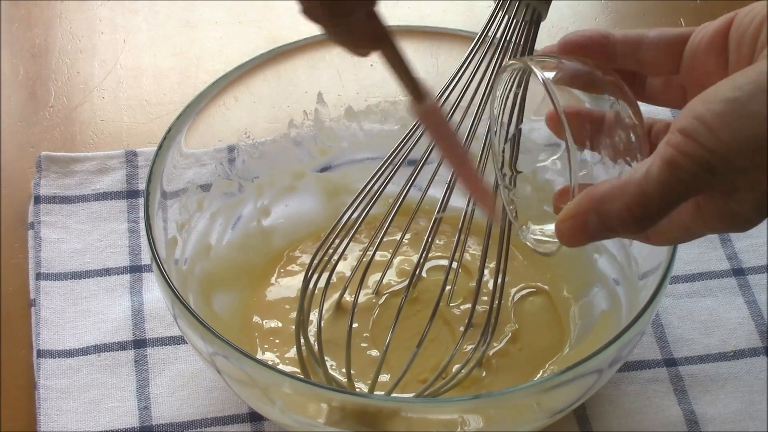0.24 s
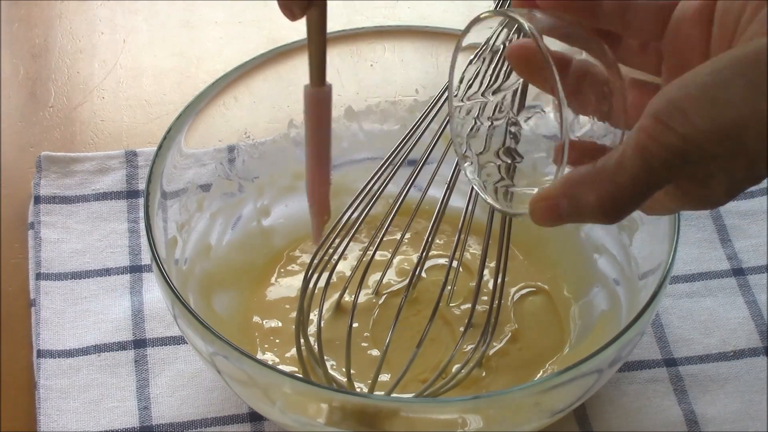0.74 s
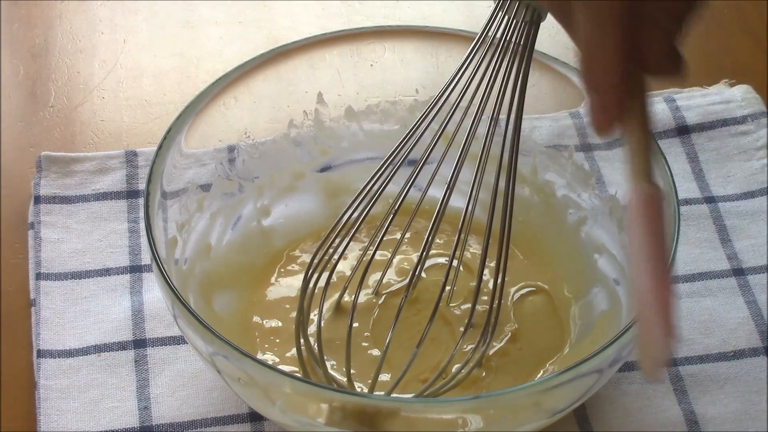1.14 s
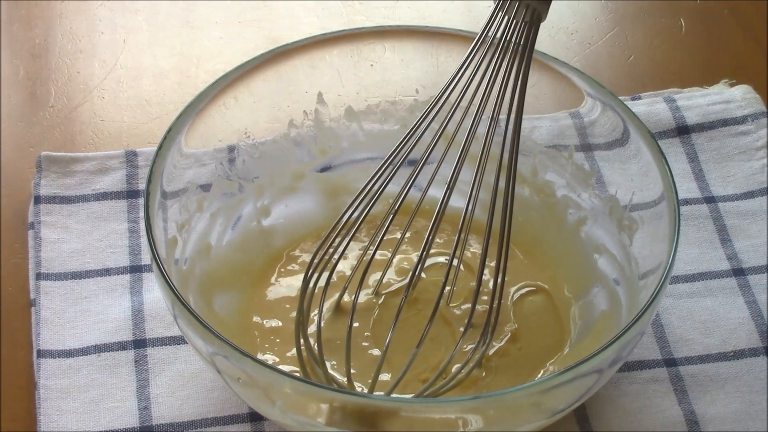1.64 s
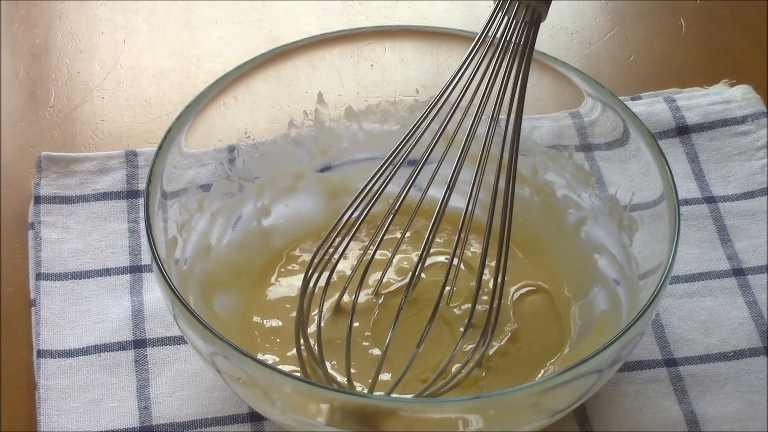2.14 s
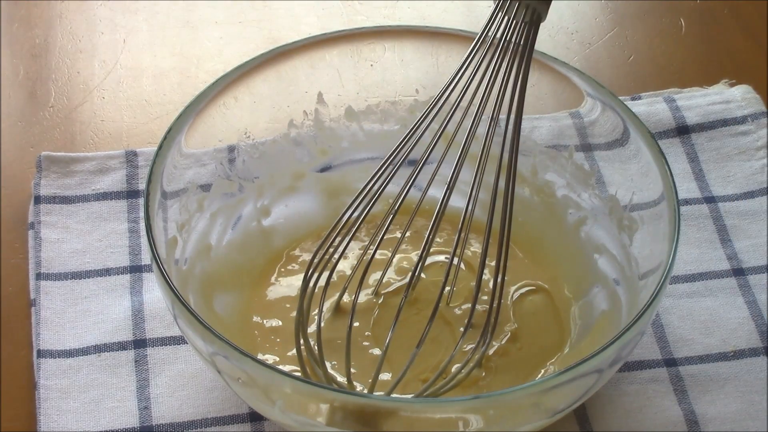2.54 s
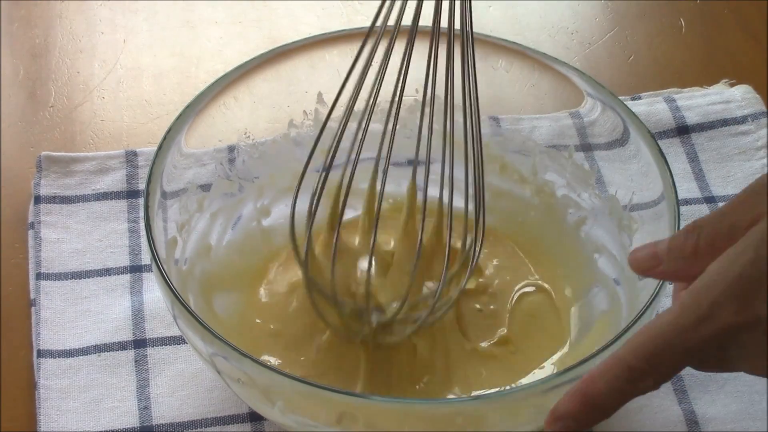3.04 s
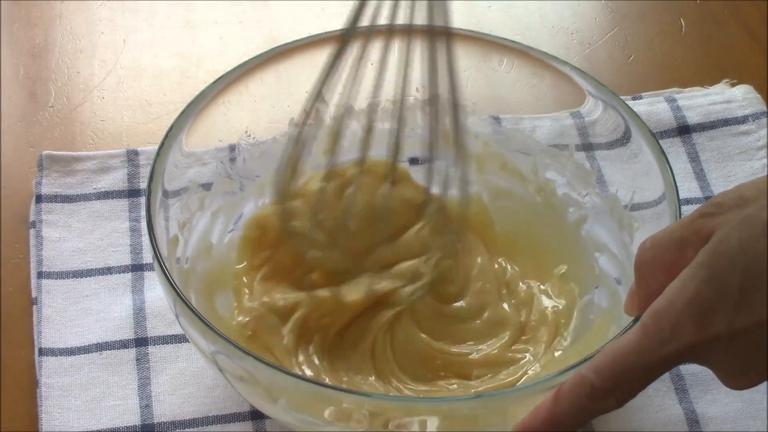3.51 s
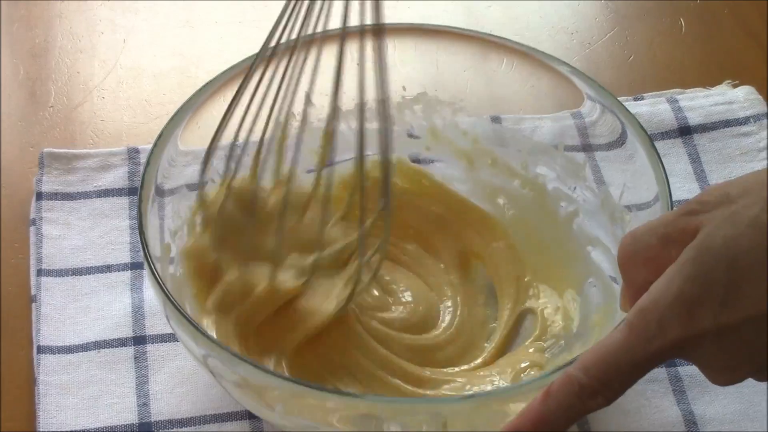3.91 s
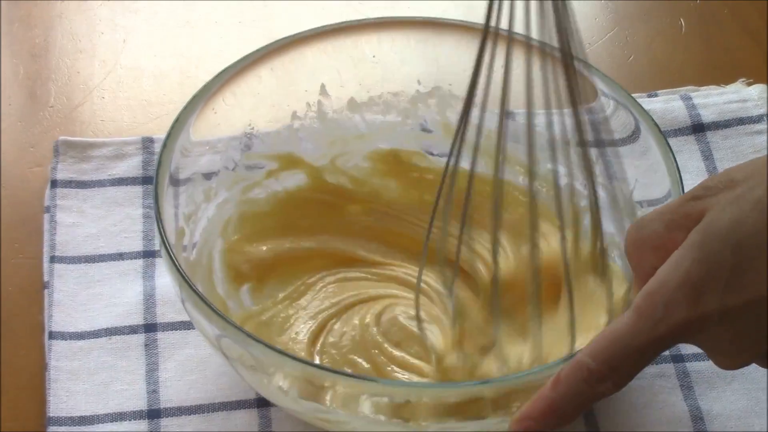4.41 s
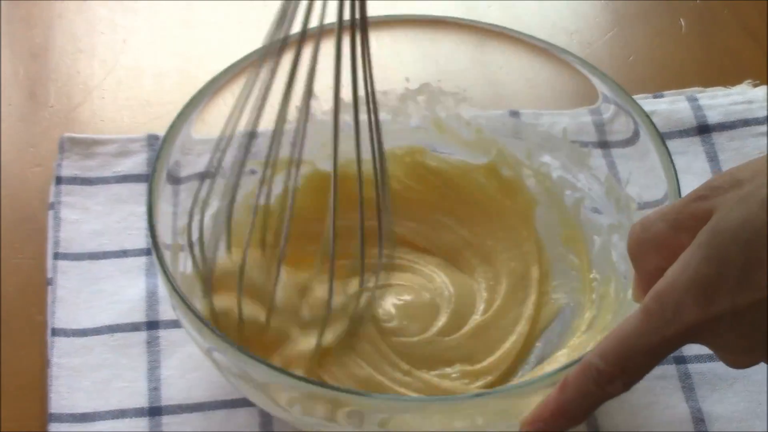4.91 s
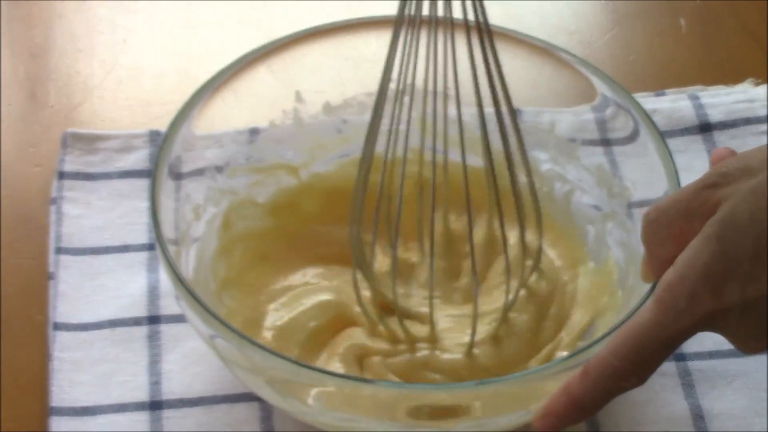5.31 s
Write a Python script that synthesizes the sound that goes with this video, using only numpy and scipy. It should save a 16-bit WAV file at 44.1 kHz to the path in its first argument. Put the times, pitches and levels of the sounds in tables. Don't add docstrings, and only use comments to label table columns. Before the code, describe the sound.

Glass clinks and a wooden knock on a kitchen table, a short pause, then brisk whisking of thick batter against a glass bowl.

```python
import sys
import numpy as np
from scipy import signal
from scipy.fft import rfft, irfft, next_fast_len
from scipy.io import wavfile

SR = 44100
rng = np.random.default_rng(int(sys.argv[2]) if len(sys.argv) > 2 else 0)


def ratio_of_db(decibels):
    return 10 ** (np.asarray(decibels, float) / 20)


def unload_audio(sound):
    columns = np.transpose(np.atleast_2d(sound))
    steps = np.round(np.clip(columns, -1, 1) * 32767)
    wavfile.write(sys.argv[1], SR, steps.astype(np.int16))


N = 245195


def unit(x):
    return x / np.sqrt(np.mean(x ** 2) + 1e-20)


def along(points, hz):
    point_hz, value = np.transpose(points)
    return np.interp(np.log(hz + 1), np.log(point_hz + 1), value)


def filtered(x, response):
    size = next_fast_len(len(x) + 8192)
    spectrum = rfft(x, size) * response(np.fft.rfftfreq(size, 1 / SR))
    return irfft(spectrum, size)[:len(x)]


def bass_cut(hz, corner_hz):
    return 1j * hz / (corner_hz + 1j * hz)


def resonances(peaks):
    def response(f):
        total = 0
        for k, (hz, width_hz, db) in enumerate(peaks):
            peak = 1j * f * width_hz / (hz * hz - f * f + 1j * f * width_hz)
            total = total + (-1) ** k * ratio_of_db(db / 2) * peak
        total = total ** 2
        return total / np.sqrt(np.mean(abs(total) ** 2))
    return response


def causal(colour):
    spectrum = ratio_of_db(along(colour, np.fft.rfftfreq(4096, 1 / SR))) + 1e-6
    cepstrum = irfft(np.log(spectrum))
    cepstrum[1:2048] *= 2
    cepstrum[2049:] = 0
    pulse = irfft(np.exp(rfft(cepstrum)))
    return pulse / np.linalg.norm(pulse)


def burst(lives, count):
    fade = np.exp(-np.arange(count) / SR / np.reshape(lives, (-1, 1)))
    noise = fade * rng.standard_normal(fade.shape)
    energy = np.linalg.norm(fade, axis=1, keepdims=True)
    return noise * energy / np.linalg.norm(noise, axis=1, keepdims=True)


# (pitch_hz, t60_s)
REVERB_TIMES = [(300, 0.44), (1200, 0.23), (4000, 0.23), (9000, 0.21), (16000, 0.19)]
# (delay_s, level_db)
NEAR_ECHOES = [
    (.0065, -32.5),
    (.0085, -22.5),
    (0.019, -28),
    (0.023, -41.5),
]


def room(x, tail_db, direct=1):
    hz, t, grid = signal.stft(rng.standard_normal(SR // 2), SR, nperseg=256)
    fade = ratio_of_db(-60 * t / along(REVERB_TIMES, hz)[:, None])
    tail = signal.istft(grid * fade, SR, nperseg=256)[1][:SR // 2]
    tail *= 1 - np.exp(-np.arange(len(tail)) / SR / 0.002)
    answer = ratio_of_db(tail_db) * tail / np.linalg.norm(tail)
    answer[0] = direct
    for delay_s, db in NEAR_ECHOES:
        answer[round(delay_s * SR)] += ratio_of_db(db)
    return signal.fftconvolve(x, answer)


def strikes(contacts, modes, colour, tail_db):
    out = np.zeros(N + 2 * SR)
    t = np.arange(SR // 2) / SR
    pulse = causal(colour)
    for start_s, db, ring_db, length_s, treble_db in contacts:
        ring = np.zeros(len(t))
        for (hz, level_db, t60_s), chance_db in zip(modes, rng.standard_normal(len(modes))):
            ring += ratio_of_db(level_db + chance_db - 60 * t / t60_s) * np.sin(2 * np.pi * hz * t)
        rough = burst(max(length_s, 2e-4), count=SR // 2)[0]
        crack = signal.fftconvolve(rough, pulse)[:len(t)]

        def hardness(hz):
            shelf = (1 + ratio_of_db(treble_db) * 1j * hz / 3000) / (1 + 1j * hz / 3000)
            return shelf * bass_cut(hz, 330) ** 3

        even = np.pad(pulse, (0, len(t) - len(pulse))) * np.linalg.norm(crack)
        wet = room(filtered(even, hardness), tail_db, direct=0)
        wet[:len(t)] += filtered(crack, hardness)
        wet += room(filtered(ratio_of_db(ring_db) * ring, hardness), tail_db - 14.5)
        out[round(start_s * SR):][:len(wet)] += ratio_of_db(db - 6.0) * wet
    return out[:N]


# (pitch_hz, level_db)
FAN_COLOUR = [(20, -34.5), (91, -28.5), (184, -25), (251, -12.5), (332, -17.5), (404, -11), (729, -3.5),
              (1050, -9), (1950, -12), (5830, -26), (10000, -29.5), (15700, -34), (16300, -42.5)]
# (pitch_hz, width_hz, level_db)
MOTOR_TONES = [(121.4, 5.4, -93.5), (250.15, 20, -73.5), (375.2, 14, -76.5), (665.3, 36, -71.5),
               (753, 22, -68.5), (964, 33, -68), (1970, 53, -79.5), (7000, 60, -83), (14100, 74, -97)]


def kitchen_air():
    rush = filtered(rng.standard_normal(N), lambda hz: ratio_of_db(along(FAN_COLOUR, hz)))
    air = ratio_of_db(-59.0) * unit(rush)
    for hz, width_hz, db in MOTOR_TONES:
        air += ratio_of_db(db) * unit(filtered(rng.standard_normal(N), resonances([(hz, width_hz, 0)])))
    return air


# (start_s, level_db)
TABLE_THUMPS = [
    (1.7181, -54.5),
    (1.8767, -52.5),
]


def thumps():
    out = np.zeros(N + SR)
    age = np.arange(SR // 20) / SR / 0.0036
    for start_s, db in TABLE_THUMPS:
        out[round(start_s * SR):][:len(age)] += ratio_of_db(db) * (1 - age) * np.exp(-age)
    return out[:N]


# (start_s, level_db, ring_db, length_s,
# treble_db)
CUP_TAP = [
    (.0878, -18, -6.5, 0.0011, -1.5),
    (.0965, -35, 0, 0.0013, -24),
    (.1052, -35, 2, 0.0024, -26),
]
RIM_BRUSHES = [
    (.177, -53, -13, 0.0025, 10),
    (.343, -50.5, -2.5, 0.0043, 2.7),
    (.349, -56, -20, 0.0037, 8.9),
    (.391, -41.5, -7, 0.0032, 3.3),
]
# (pitch_hz, level_db, t60_s)
TAPPED_CUP_MODES = [(1134, -11, 0.032), (1680, 2, 0.02), (1960, -9, 0.07), (2060, -8, .09), (2200, -9, .04),
                    (4860, -22, .015), (9600, -24.5, .06), (13500, -13, .03)]
CUP_RIM_MODES = [(1910, 7.5, 0.052), (4880, -0.5, 0.058), (8800, -13, .05), (9680, -16, .04)]
# (pitch_hz, level_db)
TAP_CRACK = [(200, -51), (770, -6.5), (1400, -12), (1900, 3), (2500, -13), (3200, -35), (4800, -16),
             (13500, -44), (16500, -65)]


def spatula_on_cup():
    taps = strikes(CUP_TAP, TAPPED_CUP_MODES, TAP_CRACK, tail_db=-6.5)
    return taps + strikes(RIM_BRUSHES, CUP_RIM_MODES, TAP_CRACK, tail_db=1)


# (start_s, level_db, ring_db, length_s, treble_db)
CUP_LANDING = [
    (1.7183, -8, -10, 0.0013, 1),
    (1.7243, -8.5, -21, 0.0038, 1),
]
# (pitch_hz, level_db, t60_s)
FREE_CUP_MODES = [(1305, -12.5, 0.087), (1690, -2.5, 0.058), (4296, -14.5, .2), (4762, -12, 0.25),
                  (4788, -13, .25), (4813, -13, .2), (5820, -18.5, 0.086), (7700, 2, 0.1), (7890, -6, .07),
                  (8085, -7.5, 0.07), (9600, -5.5, .04), (12041, -2, .19), (12100, -3, .12),
                  (14080, -13.5, .05)]
# (pitch_hz, level_db)
LANDING_CRACK = [(18, -66.5), (30, -37.5), (171, -48.5), (732, -4.5), (814, -9.5), (1890, 0.5), (3970, -13),
                 (4770, -6), (6550, -15.5), (7880, 6), (10800, -13), (12000, -2), (16500, -22.5)]


def cup_put_down():
    return strikes(CUP_LANDING, FREE_CUP_MODES, LANDING_CRACK, tail_db=-2.0)


# (start_s, level_db, ring_db, length_s, treble_db)
FIRST_CLINKS = [
    (1.8652, -17, -18.5, .002, -7.5),
    (1.8685, -25, -8.5, .003, -1.5),
]
SPATULA_CLASH = [
    (1.8762, -15, -5.5, 0.0038, 9.5),
    (1.8785, -13, -19.5, 0.0025, 3),
    (1.886, -14.5, -14, 0.0073, -2.5),
]
# (pitch_hz, level_db, t60_s)
SPATULA_CUP_MODES = [(964, -6, 0.1), (1200, 4.5, 0.075), (1385, -1, .055), (1530, -10, .03),
                     (1860, -10, 0.04), (4760, -14, 0.06), (6368, -10, 0.045), (6990, -9, .04),
                     (7920, -6, .05), (9675, 7, 0.046), (12090, -12, .05), (13550, -8, .03)]
# (pitch_hz, level_db)
CLASH_CRACK = [(18, -60), (30, -48), (158, -69.5), (835, -12.5), (1210, 3), (1310, -3), (3570, -19.5),
               (4410, -15), (9230, -16), (9990, -15.5), (11400, -22.5), (15200, -14), (16500, -51.5)]


def spatula_put_down():
    clinks = strikes(FIRST_CLINKS, FREE_CUP_MODES, CLASH_CRACK, tail_db=2.5)
    return clinks + strikes(SPATULA_CLASH, SPATULA_CUP_MODES, CLASH_CRACK, tail_db=4.0)


# (start_s, level_db, ring_db, length_s, treble_db)
ROCKING = [
    (2.031, -31, -11, 0.0025, -22),
    (2.056, -31, -7.5, 0.0032, 0.5),
]
BOUNCES = [
    (2.092, -25.5, 2.5, 0.0043, -24),
    (2.0965, -23.5, -1.5, 0.0032, 2.5),
    (2.1, -28, -5.5, 0.0015, 0.5),
]
SETTLING = [
    (2.2214, -40, 0, 0.0018, 0),
    (2.2434, -46, -10, 0.0016, 0),
]
# (pitch_hz, level_db, t60_s)
ROCKING_MODES = [(1220, -1, .03), (1800, 2, 0.02), (4600, -22, 0.05), (5750, -12, 0.14), (7000, 4, 0.016),
                 (9630, -4.5, 0.031)]
BOUNCING_MODES = [(1093, -10.5, 0.18), (1717, -2.5, 0.06), (4080, -9, 0.034), (7160, -8, 0.017),
                  (9240, -1.5, 0.015), (10750, -11, 0.048), (13560, -7, 0.018)]
SETTLING_MODES = [(2070, 9.5, 0.016), (4300, -4, 0.04), (7360, -9, .04), (9850, -14, .04),
                  (12500, -22, .02)]
# (pitch_hz, level_db)
ROCK_CRACK = [(290, -48), (500, -23), (1120, 5.5), (1890, -7.5), (2570, -23), (7170, -20), (15100, -27),
              (16500, -49.5)]
BOUNCE_CRACK = [(180, -77), (300, -38), (1130, 1.5), (1770, -3), (3140, -21), (4030, -18.5), (9330, -22),
                (11800, -26), (13500, -23), (16500, -42)]


def rocking_to_rest():
    rocks = strikes(ROCKING, ROCKING_MODES, ROCK_CRACK, tail_db=1.5)
    bounces = strikes(BOUNCES, BOUNCING_MODES, BOUNCE_CRACK, tail_db=1.0)
    return rocks + bounces + strikes(SETTLING, SETTLING_MODES, ROCK_CRACK, tail_db=-1)


# (start_s, level_db, ring_db, length_s, treble_db)
HANDLE_KNOCKS = [
    (2.3205, -31.5, -27, 0.0012, -18),
    (2.3353, -18, -9.5, 0.0022, 5.5),
    (2.3745, -28.5, -5, 0.0015, -26),
]
# (pitch_hz, level_db, t60_s)
WOOD_MODES = [(527, -5.5, 0.093), (900, -11, 0.032), (1256, -2, 0.04), (1550, -3, 0.072), (1950, 5, .014),
              (3080, 10.5, 0.0094), (4870, -2, 0.0065), (8000, -3, 0.0044)]
# (pitch_hz, level_db)
WOOD_CRACK = [(120, -75.5), (200, -34), (522, -4), (900, 0), (1500, -0.5), (3200, -7.5), (7460, -25.5),
              (14000, -50.5), (16500, -60)]


def handle_knock():
    return strikes(HANDLE_KNOCKS, WOOD_MODES, WOOD_CRACK, tail_db=0.2)


# (start_s, level_db, ring_db, length_s, treble_db)
BASE_KNOCK = [
    (3.4625, -34.5, -1, 0.0017, -10),
]
WALL_KNOCKS = [
    (3.9235, -39.5, -11, 0.0023, 18),
    (4.043, -49, -3.5, 0.0014, -10),
    (4.3195, -45, -8, .0015, -4),
    (5.16, -44, -4, 0.0049, -15),
    (5.178, -46, -3, 0.0036, -12),
    (5.325, -48, -8, 0.013, -14),
]
# (pitch_hz, level_db, t60_s)
BOWL_BASE_MODES = [(624, 2.8, 0.079), (820, 1.8, 0.033)]
BOWL_SIDE_MODES = [(940, 11, 0.099), (1117, 4, 0.11), (1730, 12, 0.02)]


def bowl_knocks():
    base = strikes(BASE_KNOCK, BOWL_BASE_MODES, WOOD_CRACK, tail_db=-7)
    return base + strikes(WALL_KNOCKS, BOWL_SIDE_MODES, ROCK_CRACK, tail_db=-9.5)


# (start_s, level_db, lowest pitch_hz)
WIRE_SNAPS = [(3.033, -33.5, 6500), (3.118, -35.5, 7700), (3.1854, -39, 8000), (3.298, -32.5, 6500),
              (3.4035, -35.5, 7500), (3.593, -40, 4000), (3.917, -44, 7000), (4.0271, -23, 1290),
              (4.034, -28, 9600), (4.739, -32, 1500), (5.0779, -29, 1460), (5.0876, -29, 1470),
              (3.816, -38, 9000), (3.857, -39, 8000), (3.9995, -42.5, 7500), (4.0271, -24, 6500),
              (3.8205, -45, 8000), (4.006, -52, 7000), (4.371, -42.5, 8000), (4.594, -35, 9000),
              (5.226, -46, 9000), (5.256, -52, 8000), (5.292, -52, 8000), (5.333, -42, 7000),
              (5.354, -61, 9000)]


def snaps():
    out = np.zeros(N + SR)
    width_hz = 4100
    for start_s, db, low_hz in WIRE_SNAPS:
        def wire(hz):
            peak_hz = 1.7 * low_hz
            band = bass_cut(hz, low_hz) ** 2 / (1 + 1j * hz / 14000) ** 3
            return band * 1j * hz * width_hz / (peak_hz ** 2 - hz ** 2 + 1j * hz * width_hz)

        click = filtered(burst(0.00007, count=1024)[0], wire)
        echo = np.convolve(click, burst(0.00047, count=256)[0])[:len(click)]
        click *= ratio_of_db(db) / abs(click).max()
        echo *= ratio_of_db(-10.5) * np.linalg.norm(click) / np.linalg.norm(echo)
        out[round(start_s * SR):][:len(click)] += click
        out[round((start_s + .0078) * SR):][:len(echo)] += echo
    return out[:N]


# (start_s, effort_db)
STIRRING = [
    (2.9, -21),
    (3.42, -7),
    (3.75, -6),
    (4.04, -4.5),
    (4.38, -4),
    (4.75, -3),
    (5.02, -1.5),
    (5.3, -8),
    (5.56, -11),
]


def scrape(grains_per_s, spread_db, smooth):
    t = np.arange(N) / SR
    effort_db = np.interp(t, *np.transpose(STIRRING), left=-60)
    draw = rng.random((4, N))
    slips = (draw[0] < grains_per_s / SR) * ratio_of_db(-spread_db * draw[1:])
    slips = signal.lfilter([1], [1, -np.exp(-1 / (0.0015 * SR))], slips)
    drag = np.zeros((3, N))
    for k, (full_db, growth) in enumerate([(-52, 1.1), (-54.5, 1.2), (-61, 0.91)]):
        rubbing = (unit(slips[k]) + smooth) * rng.standard_normal(N)
        drag[k] = ratio_of_db(full_db + growth * effort_db) * unit(rubbing)
    lift_start_s, lift_length_s = 5.39, .085
    lift = np.clip((t - lift_start_s) / lift_length_s, 0, 1)
    drag[2] += ratio_of_db(-58) * np.sin(np.pi * lift ** 0.54) * rng.standard_normal(N)
    return drag


# (start_s, wire_db, glass
# wall_db, bowl_db, ping_hz)
WHISK_STROKES = [(3.0949, -43.5, -62, -59, 1960), (3.1408, -33, -49.5, -44.5, 1860),
                 (3.3298, -46, -56.5, -55, 3300), (3.4144, -48, -53, -54, 1800),
                 (3.4552, -46, -52, -43, 2150), (3.4602, -50, -49, -50, 2600),
                 (3.4724, -54, -55, -40.5, 2000), (3.491, -48, -54, -50, 2050),
                 (3.5558, -50, -70, -67, 1970), (3.571, -46, -67, -55, 1820),
                 (3.6153, -41.5, -51.5, -48.5, 1880), (3.674, -46, -54.5, -50, 1940),
                 (3.7073, -47, -53, -49.5, 2580), (3.7116, -42, -50, -51, 3560),
                 (3.745, -45, -59, -61, 1960), (3.7623, -49, -52, -47, 2290), (3.781, -50, -62, -59, 2050),
                 (3.7958, -40, -53, -52, 3260), (3.7979, -43, -55, -47, 1730),
                 (3.8119, -43, -50, -47, 1470), (3.8277, -48, -49, -45.5, 1830),
                 (3.8319, -47, -45, -55, 1860), (3.838, -42, -53, -45.5, 1670),
                 (3.8836, -52, -58, -57, 1810), (3.9067, -47, -49, -44, 2060),
                 (3.921, -31, -41.5, -36.5, 1520), (3.925, -37, -45.5, -39, 1770),
                 (3.9345, -48, -45, -39, 1640), (3.97, -42, -54, -49, 1800),
                 (4.0432, -44, -54, -44.5, 1840), (4.0547, -49, -52, -52, 1980),
                 (4.0775, -43, -51, -51, 1870), (4.0853, -41, -48.5, -57, 4510),
                 (4.111, -47, -60, -48, 1510), (4.1275, -27.5, -45, -41, 3180),
                (4.1306, -35.5, -40, -52, 3380), (4.1364, -43, -65, -44, 3370),
                (4.143, -49, -56, -50, 1910), (4.1558, -41, -52, -48, 1780), (4.1654, -43, -51, -49, 1760),
                (4.1788, -38, -49.5, -42, 3160), (4.1815, -44, -48, -52, 1760),
                (4.231, -53, -56, -54, 1430), (4.2318, -37.5, -48, -45, 1950),
                (4.2467, -44, -51, -41.5, 1800), (4.2584, -48, -49, -43.5, 1650),
                (4.2663, -40, -46, -53, 2040), (4.2968, -39, -53, -53, 1850), (4.3175, -46, -49, -49, 2420),
                (4.3344, -39, -44, -43, 3500), (4.3371, -38, -47.5, -42, 4850),
                (4.3414, -47, -57, -47, 1950), (4.346, -45, -57, -54, 1830), (4.37, -40.5, -54, -54, 1420),
                (4.3856, -41, -45.5, -45, 4450), (4.396, -47, -68, -45, 1830),
                (4.4122, -46, -64, -54, 1440), (4.4339, -49, -54, -48, 2080), (4.438, -28, -44, -41, 4720),
                (4.4417, -36.5, -48, -43, 1800), (4.4493, -37, -46, -43.5, 1840),
                (4.4541, -39, -44, -57, 3940), (4.4728, -41, -51, -60, 1590), (4.4871, -39, -49, -46, 1400),
                (4.5005, -34, -47, -55, 2040), (4.5184, -40, -49, -40.5, 4540),
                (4.5273, -42, -50, -44, 1860), (4.5341, -20.5, -37.5, -45, 1900),
                (4.5401, -32, -42, -36.5, 2300), (4.5452, -44, -43, -45.5, 2020),
                (4.5544, -48, -63, -56, 2130), (4.5696, -48, -56, -56, 1790),
                (4.5874, -48, -49.5, -43.5, 1770),
                 (4.6344, -43, -61, -55, 1400), (4.6408, -43, -62, -53, 1400), (4.6446, -40, -49, -44, 2010),
                (4.6486, -42, -41, -51, 3970), (4.6609, -45, -56, -59, 3900),
                (4.692, -35, -47.5, -60, 1970), (4.7102, -51, -45, -41, 2580),
                (4.7303, -29.5, -42.5, -38, 1840), (4.7544, -45, -56, -46, 1700),
                (4.7575, -42, -60, -51, 1560), (4.7735, -45, -54, -53, 2160),
                (4.7969, -44, -45.5, -57, 3930), (4.804, -44.5, -49, -61, 4440),
                (4.8266, -41, -67, -61, 1670), (4.831, -44, -62, -61, 1870), (4.8417, -45, -63, -57, 1870),
                (4.8489, -46, -45, -49, 1880), (4.8528, -38, -54, -44.5, 1800),
                (4.8696, -41.5, -50, -53, 3650), (4.8789, -47, -50.5, -44, 1650),
                (4.8949, -58, -54, -45, 2120), (4.898, -38, -55, -45, 1950), (4.9114, -43, -48, -40, 1830),
                (4.9277, -36, -43, -45, 1460), (4.943, -41.5, -47.5, -47, 5370),
                (4.948, -32, -48, -53, 3250), (4.9492, -31, -42, -39, 1970), (4.9624, -34, -44, -45, 2020),
                (4.9931, -49, -64, -64, 1930), (5.0006, -47, -60, -60, 1910),
                (5.022, -42, -47.5, -48, 1980), (5.0256, -45, -43, -42.5, 3400),
                (5.0428, -52, -52, -47, 3300), (5.0644, -53, -63, -60, 1850), (5.0799, -31, -53, -41, 1810),
                (5.112, -52, -54, -44, 1800), (5.1323, -39, -48, -49, 2190),
                (5.1416, -48, -47.5, -43.5, 1430), (5.1704, -36.5, -51, -48, 1960),
                (5.176, -35.5, -45.5, -50, 1870),
                 (5.1802, -40, -51, -46, 1830),
    (5.2315, -49, -66, -57, 1900),
    (5.2458, -39, -51, -49, 1940),
    (5.3108, -46, -52.5, -55, 1700),
]


def ticks():
    contacts = WHISK_STROKES
    force, ping = np.zeros((3, N + SR)), np.zeros(N + SR)
    t = np.arange(2048) / SR
    for start_s, wire_db, wall_db, bowl_db, ping_hz in contacts:
        at = round((start_s + .0008) * SR)
        push_db = np.array([bowl_db, wall_db, wire_db]) + [-1.5, 2.5, -8.5]
        force[:, at:][:, :len(t)] += ratio_of_db(push_db)[:, None] * burst([0.0043, 0.0024, 0.0015], count=2048)
        ping_db = 1 + (bowl_db if ping_hz < 2300 else wall_db)
        ping[at:][:len(t)] += ratio_of_db(ping_db - 60 * t / 0.018) * np.sin(2 * np.pi * ping_hz * t)
        twang_hz = 7000 * 2.4 ** rng.random()
        ping[at:][:len(t)] += ratio_of_db(wire_db - 8.5 - 60 * t / .007) * np.sin(2 * np.pi * twang_hz * t)
    return force[:, :N], ping[:N]


# (pitch_hz, width_hz, level_db)
BOWL_BODY = [(597, 290, -4), (877.4, 43, 8), (1052, 165, 5.5), (1380, 510, -2), (1830, 320, 8.5),
             (2310, 1600, -11.5)]
GLASS_WALL = [(2480, 690, 1), (3910, 1500, 3.5), (4690, 700, 9.5), (6500, 2540, -6.5)]
WHISK_WIRES = [(8000, 3200, 0), (11500, 3900, 13), (15600, 2100, 2)]


def whisk():
    force, pings = ticks()
    force = force + ratio_of_db(-6.0) * scrape(grains_per_s=440, spread_db=15.5, smooth=0.54)
    dry = filtered(pings, lambda hz: bass_cut(hz, 600) ** 2)
    for push, body in zip(force, (BOWL_BODY, GLASS_WALL, WHISK_WIRES)):
        dry = dry + filtered(push, resonances(body))
    dry = dry + snaps()
    out = np.zeros(N + SR)
    step = SR // 4
    for k in range(0, N, step):
        wet = room(dry[k:k + step], tail_db=-6.5)
        out[k:k + len(wet)] += wet
    return out[:N]


def scene():
    put_down = cup_put_down() + spatula_put_down() + rocking_to_rest() + handle_knock()
    mix = kitchen_air() + thumps() + spatula_on_cup() + put_down + bowl_knocks() + whisk()
    return mix[None]


def low_pass(x):
    return signal.sosfilt(signal.butter(12, 16790, fs=SR, output="sos"), x)


def record(dry):
    limit, top_hz = .56, 15880
    shaved = dry[0] / (1 + abs(dry[0] / limit) ** 4) ** (1 / 4) - dry[0]
    mic = dry[0] + filtered(shaved, lambda hz: bass_cut(hz, 300) ** 2)
    mic = filtered(mic, lambda hz: 1 / np.sqrt(1 + (hz / top_hz) ** 60))
    return low_pass(mic[None])


dry = scene()
out = record(dry)
unload_audio(out)
```